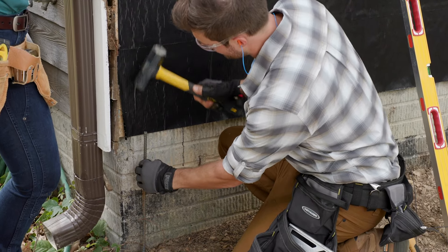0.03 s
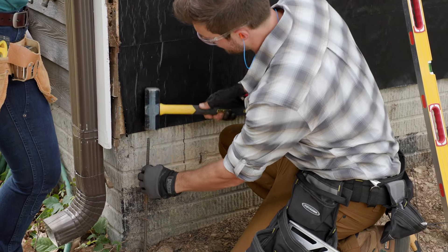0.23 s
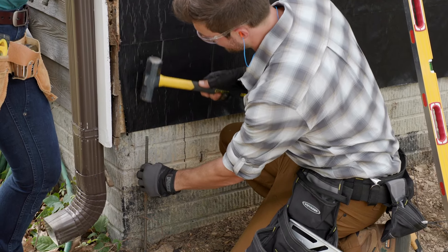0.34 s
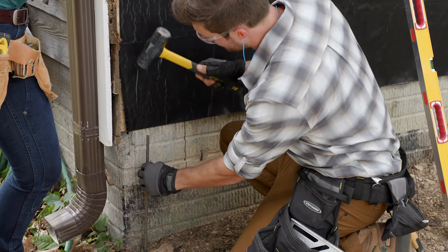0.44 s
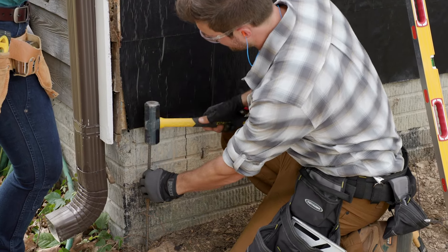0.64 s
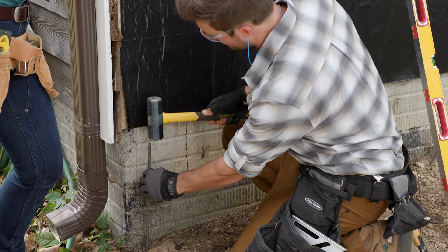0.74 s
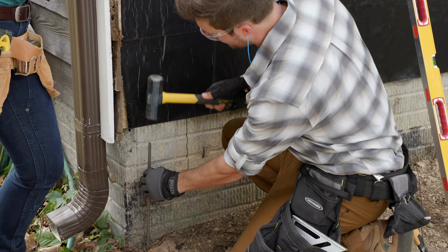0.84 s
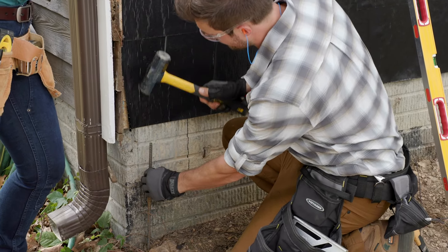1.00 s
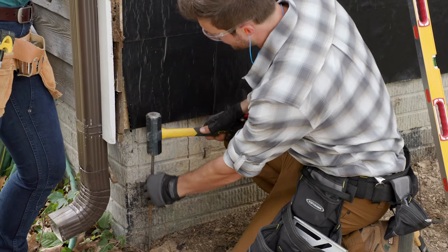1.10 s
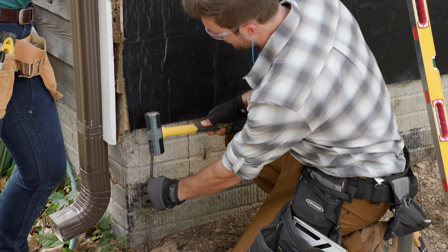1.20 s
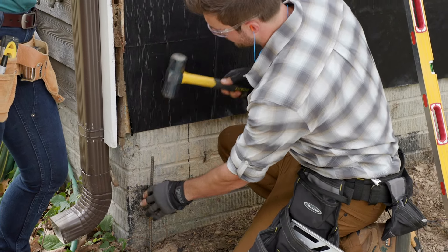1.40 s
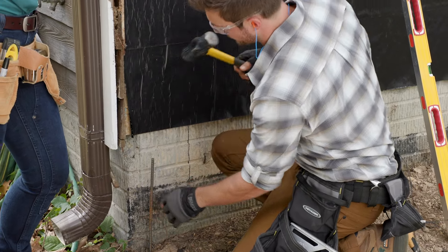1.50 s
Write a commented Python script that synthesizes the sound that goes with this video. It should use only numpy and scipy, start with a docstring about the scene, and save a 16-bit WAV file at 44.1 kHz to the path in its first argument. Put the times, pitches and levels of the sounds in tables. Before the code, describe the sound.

Three hard hammer blows on a metal stake, half a second apart, with a deep overloaded thump

```python
"""Quiet outdoor air and a faint far bird come first; then a small sledge drives a thin steel stake into the ground.
Three blows fall half a second apart beside a house wall: at each the stake chatters and grinds into the soil.
Filtered noise makes the slide, decaying sinusoids the brief ring of the steel, convolution the answer of the yard.
A deep damped resonance, likely a bump on the close microphone, overloads it after the first blow.
Light ticks fall before and between the blows, and clothing, a noise of varying level, shifts after the last."""
import sys
import numpy as np
from scipy import signal
from scipy.fft import rfft, irfft, next_fast_len
from scipy.io import wavfile
from scipy.ndimage import map_coordinates

SR = 44100
rng = np.random.default_rng(int(sys.argv[2]) if len(sys.argv) > 2 else 0)


def unload_wav(signal):
    """Save mono or channel-first audio to the path in sys.argv[1] as 16-bit WAV at rate SR, clipped to [-1, 1]."""
    wavfile.write(
        sys.argv[1],
        SR,
        np.round(np.clip(np.atleast_2d(signal).T, -1, 1) * 32767).astype(np.int16),
    )


N = 68355  # length [samples]


def amp(db):
    """Level as an amplitude ratio: 20 dB per factor of ten."""
    return 10 ** (np.asarray(db) / 20)


def unit(x):
    """Normalisation to a root-mean-square value of 1."""
    return x / np.sqrt(np.mean(x ** 2) + 1e-20)


def along(points, hz):
    """Interpolation of (frequency [Hz], value) points on a logarithmic frequency axis."""
    f, v = np.transpose(points)
    return np.interp(np.log(hz + 1), np.log(f + 1), v)


def since(start_s):
    """Time elapsed since an onset [s], zero before it."""
    return np.maximum(np.arange(N) / SR - start_s, 0)


def fade(t, t60):
    """Exponential decay: the level falls 60 dB in t60 seconds."""
    return np.exp(-np.log(1000) * t / t60)


def wobble(rate):
    """Random modulation: a smooth curve through `rate` random knots a second."""
    return map_coordinates(rng.standard_normal(N), [np.arange(N) * rate / SR + 2])


def filtered(x, response):
    """Linear filtering: the spectrum of x times a response of frequency."""
    m = next_fast_len(N + SR // 2)  # zero padding
    hz = np.fft.rfftfreq(m, 1 / SR)
    return irfft(rfft(x, m) * response(hz), m)[:N]


def noise(spectrum):
    """Spectral shaping of white noise, at rms 1."""
    return unit(filtered(rng.standard_normal(N), lambda hz: amp(along(spectrum, hz))))


def band(centre_hz, octaves):
    """Noise of rms 1 through one broad resonance, with a low-pass that dulls the top."""
    def response(hz):
        distance = np.log2((hz + 1) / centre_hz) / octaves
        return 1 / (1 + distance ** 2) / (1 + (hz / 4200) ** 4)
    return unit(filtered(rng.standard_normal(N), response))


# spectrum of the outdoor air: (frequency [Hz], relative level [dB per Hz])
AIR = [(15, -39.5), (25, -12), (102, 2.5), (317, -19), (607, -17.5), (796, -24.5), (1290, -21.5),
       (1740, -26), (2000, -27), (2160, -25.5), (11900, -38), (16000, -40.5)]
# level curve of shifting sleeve and glove: (time [s], level [dB])
RUSTLE = [(1.251, -77), (1.341, -67.5), (1.45, -60), (1.5, -50.5), (1.55, -54)]
# spectrum of the cloth: (frequency [Hz], relative level [dB per Hz])
CLOTH = [(40, -4), (130, 4.5), (300, -6.5), (700, -9.5), (2000, -19.5), (10000, -31), (16000, -34.5)]
AIR_DB = -54.5


def background():
    """Modulated noise: quiet outdoor air, and clothing that shifts after the last blow."""
    air = amp(AIR_DB + 1.3 * wobble(rate=9.5)) * noise(AIR)
    rustle_db = np.interp(since(0), *np.transpose(RUSTLE)) + 1.5 * wobble(rate=38)
    return air + amp(rustle_db) * noise(CLOTH)


# far bird whistles: (time [s], length [s], starting pitch [Hz], fall in pitch [Hz], level [dB])
WHISTLES = [(0.085, 0.19, 2604, 420, -61), (0.094, 0.1, 1282, 80, -60), (0.872, 0.12, 2587, 367, -63.5),
            (0.964, .11, 2013, 81.5, -65.5)]


def bird():
    """Frequency modulation: thin far whistles, near-pure tones that sag at the end."""
    out = np.zeros(N)
    for start_s, length_s, pitch_hz, fall_hz, db in WHISTLES:
        progress = np.minimum(since(start_s) / length_s, 1)
        hz = pitch_hz - fall_hz * progress ** 4 + 55 * wobble(rate=250)
        swell = np.sqrt(np.abs(np.sin(np.pi * progress)))
        tone = np.sin(2 * np.pi * np.cumsum(hz) / SR)
        out += amp(db + 2.5 * wobble(rate=59)) * swell * tone
    return outdoors(out)


# colour of the near scatter: (frequency [Hz], relative level [dB])
WALL = [(60, -1.5), (170, 5), (300, 1), (2500, -1.5), (4500, 1), (10000, 1)]
# decay of the yard: (frequency [Hz], t60 [s])
YARD = [(150, .5), (300, 0.71), (2500, .35), (8000, 0.19), (15000, 0.23)]
WALL_DB, WALL_T60, YARD_DB = -17, 0.15, -31
ECHO_DELAY_S = 0.0046


def outdoors(x):
    """Convolution with an impulse response: quick scatter from wall and ground, then the yard's faint tail."""
    t = since(ECHO_DELAY_S)[:SR // 2]
    wall = rng.standard_normal(len(t)) * fade(t, WALL_T60) * (t > 0)
    wall = wall / np.linalg.norm(wall)
    wall = filtered(wall, lambda hz: amp(along(WALL, hz)))[:len(t)]
    # each frequency of the yard's noise decays at its own rate
    hz, frame_s, cells = signal.stft(rng.standard_normal(SR // 2), SR, nperseg=256)
    cells = cells * fade(frame_s, along(YARD, hz)[:, None])
    yard = signal.istft(cells, SR, nperseg=256)[1][:len(t)] * (t > 0)
    yard = yard / np.linalg.norm(yard)
    return x + signal.fftconvolve(x, amp(WALL_DB) * wall + amp(YARD_DB) * yard)[:N]


# small ticks of tool and stake: (time [s], level [dB], centre [Hz], width [octaves], t60 [s])
TICKS = [(.1165, -34, 562, 0.91, 0.019), (0.291, -27, 1323, 0.26, .035), (0.3202, -24, 426, 0.54, .06),
         (1.2, -33, 745, 0.86, .018)]


def ticks():
    """Damped impulsive excitation: light, dull contacts heard as decaying noise bands."""
    out = np.zeros(N)
    for start_s, db, hz, octaves, t60 in TICKS:
        t = since(start_s)
        out += amp(db) * (t > 0) * fade(t, t60) * band(hz, octaves)
    return outdoors(out)


# bending resonances of the stake, damped by glove and soil: (frequency [Hz], width [Hz], relative level [dB])
BENDS = [(215, 60, -2), (450, 100, -2), (620, 90, 2), (885, 70, 2), (1300, 160, 0), (1620, 60, -1),
         (1775, 70, 1), (2020, 70, -3), (2280, 110, -1), (2520, 70, -4), (2950, 280, -5), (6130, 130, -6),
         (9250, 150, -8), (9970, 150, -3), (12090, 300, -13), (13530, 200, -13), (14790, 160, -6)]


def bending(hz):
    """Modal superposition: the stake's damped bending resonances, summed with alternating sign."""
    h = 0
    for k, (centre, width, db) in enumerate(BENDS):
        resonance = 1j * hz * width / (centre * centre - hz * hz + 1j * hz * width)
        h = h + (-1) ** k * amp(db) * resonance
    return unit(np.abs(h)) * np.exp(1j * np.angle(h))


ATTACK_S = 0.0046  # build-up of slide and ring


def ring(t, hz, t60, rough):
    """Free vibration of one mode: built up over the attack, then decaying, its phase unsteady."""
    phase = 2 * np.pi * (hz * t + rng.random()) + rough * wobble(rate=320)
    return np.sin(phase) * np.minimum(t / ATTACK_S, 1) * fade(np.maximum(t - ATTACK_S, 0), t60)


def heave(start_s, db):
    """Heavily damped oscillation: one slow swing of air."""
    t = since(start_s)
    rise = 1 - np.exp(-t / PUSH_RISE_S)
    return amp(db) * np.sin(2 * np.pi * PUSH_HZ * t) * fade(t, PUSH_T60) * rise


# hammer blows: (time [s], slide and hollow level [dB], slide length [s], slide treble [dB],
#                steel ring [dB], high ping [dB], distance off centre [0-1], knock pitch [Hz])
BLOWS = [(0.2384, -13, 0.012, 4, -0.5, -8.5, 1, 1304), (0.7429, -9.5, 0.01, 1, 2.5, 2.5, 0.02, 643),
         (1.233, -9, 0.015, -0.5, -0.5, -1, 0.4, 2300)]
# spectrum of the grinding soil: (frequency [Hz], relative level [dB per Hz])
GRIND = [(60, -7.5), (130, 1), (580, 0), (1060, -9.5), (1700, -6.5), (3050, -11.5), (4020, -17),
         (6150, -12.5), (8600, -15.5), (10500, -10.5), (11500, -20.5), (14200, -22.5), (16000, -24.5)]
# ringing modes of the steel: (frequency [Hz], level [dB], t60 [s], extra for an off-centre blow [dB])
STEEL = [(603, -43, .1, -6), (1766, -35, .11, -4), (2019, -37, .09, -3), (2509, -39, .12, 0),
         (5905, -43, .12, -6), (6320, -40, .08, -5), (6864, -39, .09, 8), (9200, -43, .19, 7),
         (10080, -36, .2, -2), (10600, -34, .07, -2), (10890, -37, .11, -3), (12090, -35, .08, 0),
         (13530, -34, .12, -3)]
START_DB, RELEASE_T60 = -10, .028  # the slide swells, holds and stops
BEND_DB, GRIND_DB = -3, -2.5
KNOCK_DB, KNOCK_OCTAVES = -10.5, 0.15  # the stake's knock against the soil
PING_HZ, PING_DB, PING_T60 = 14790, -20.5, .105  # the hard, thin ring of the hammer head
HOLLOW_HZ, HOLLOW_OCTAVES, HOLLOW_DB, HOLLOW_T60 = 198, 0.42, -22.5, 0.23  # low, hollow after-sound
PUSH_HZ, PUSH_DB, PUSH_T60, PUSH_RISE_S = 38.5, -4, .07, .025  # the ground gives way


def blow(start_s, db, slide_s, treble_db, ring_db, ping_db, off_centre, knock_hz):
    """Forced, then free vibration: the stake chatters as it slides, the steel rings on, the ground heaves."""
    t = since(start_s)
    swell_db = START_DB * np.maximum(1 - t / ATTACK_S, 0)
    slide = (t > 0) * amp(db + swell_db) * fade(np.maximum(t - slide_s, 0), RELEASE_T60)
    chatter = slide * unit(amp(2.3 * wobble(rate=1600)))
    grind = amp(GRIND_DB) * noise(GRIND)
    knock = amp(KNOCK_DB) * band(knock_hz, KNOCK_OCTAVES)
    bend = amp(BEND_DB) * filtered(rng.standard_normal(N), bending)
    body = chatter * (grind + knock + bend)
    body = filtered(body, lambda hz: amp(along([(2500, 0), (8000, treble_db)], hz)))
    steel = np.zeros(N)
    for hz, level_db, t60, extra_db in STEEL:
        mode_db = level_db + off_centre * extra_db + rng.normal(0, 1)
        steel += amp(mode_db) * ring(t, hz, t60, rough=.35)
    ping = amp(PING_DB + ping_db) * ring(t, PING_HZ, PING_T60, rough=0.28)
    hollow_shape = np.minimum(t / ATTACK_S, 1) * fade(t, HOLLOW_T60)
    hollow = amp(db + HOLLOW_DB) * hollow_shape * band(HOLLOW_HZ, HOLLOW_OCTAVES)
    return outdoors(body + amp(ring_db) * steel + ping) + hollow + heave(start_s, PUSH_DB)


THUMP_S, THUMP_HZ, THUMP_DB, THUMP_T60 = .3163, 168.5, 6.5, .098
THUMP_RISE_S, THUMP_LENGTH_S, THUMP_FADE_S = 0.0065, 0.056, 0.022
THUMP_SNAP_HZ, THUMP_SNAP_S = 71, .0025  # it starts this much sharp; time constant of settling
HUM_DB, HUM_T60 = -39.5, .9  # what lingers of the thump


def thump(heave_db):
    """Damped resonance: one deep tone that glides down at its onset, with a faint hum after it."""
    t = since(THUMP_S)
    rise = np.sin(np.pi / 2 * np.minimum(t / THUMP_RISE_S, 1)) ** 2
    ending = np.clip((THUMP_LENGTH_S - t) / THUMP_FADE_S, 0, 1)
    shape = rise * fade(t, THUMP_T60) * ending
    snap_cycles = THUMP_SNAP_HZ * THUMP_SNAP_S * (1 - np.exp(-t / THUMP_SNAP_S))
    tone = np.sin(2 * np.pi * (THUMP_HZ * t + snap_cycles))
    hum = amp(HUM_DB) * ring(t, THUMP_HZ, HUM_T60, rough=.3)
    return -amp(THUMP_DB) * shape * tone + hum + heave(THUMP_S + THUMP_RISE_S, heave_db)


def scene():
    """Superposition: the pressures of all sources add at one close microphone."""
    blows = sum(blow(*row) for row in BLOWS)
    return (background() + bird() + ticks() + blows + thump(heave_db=-7))[None]


CLIP_TOP = 1.0  # full scale
TOP_HZ = 15800  # middle of a 400 Hz wide band edge


def record(dry):
    """Saturation, then band limiting: peaks clip at full scale and the highest treble is removed."""
    clipped = np.clip(dry[0], -CLIP_TOP, CLIP_TOP)
    return filtered(clipped, lambda hz: np.clip((TOP_HZ - hz) / 400 + .5, 0, 1))[None]


dry = scene()
out = record(dry)
unload_wav(out)
```